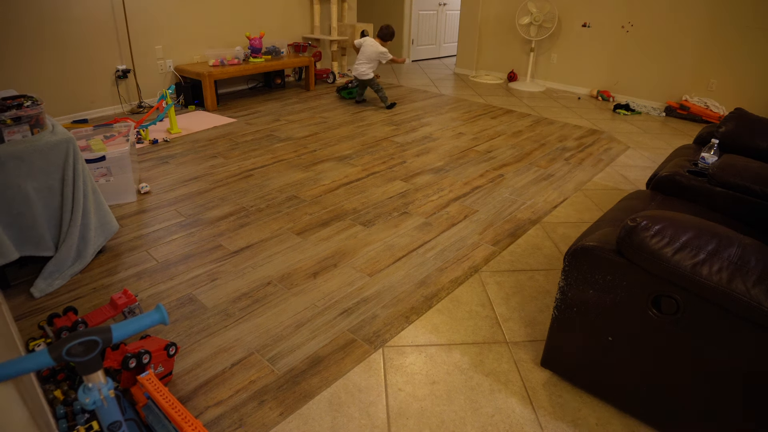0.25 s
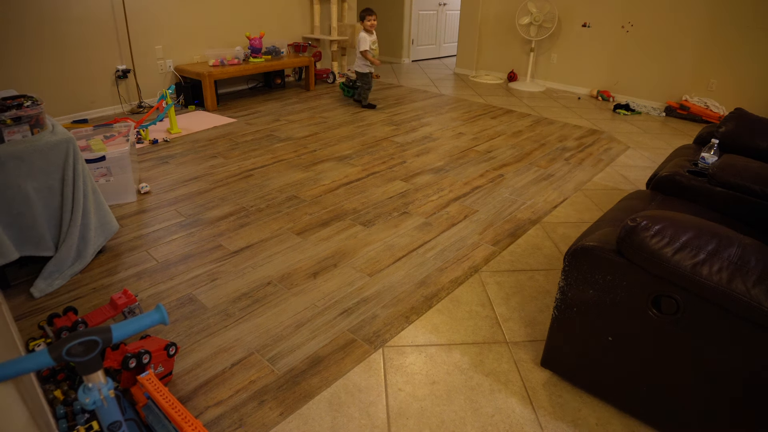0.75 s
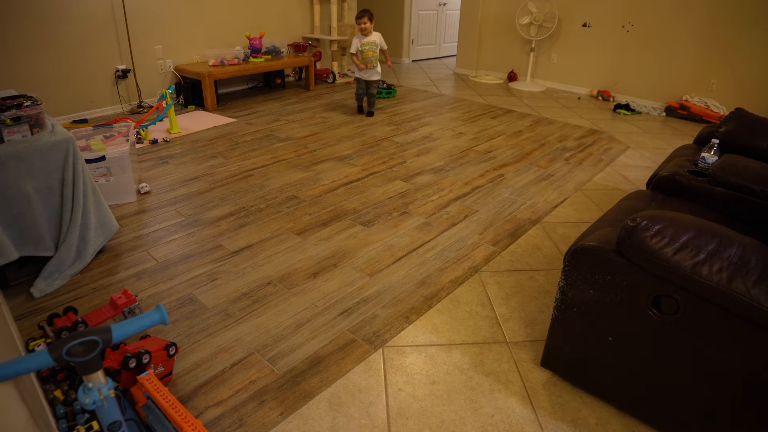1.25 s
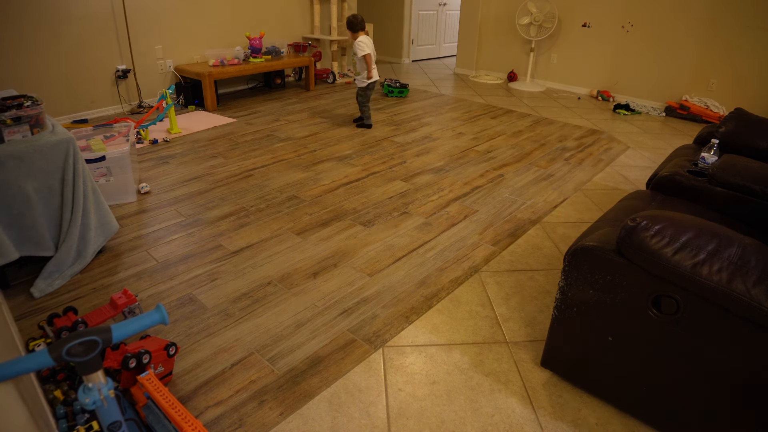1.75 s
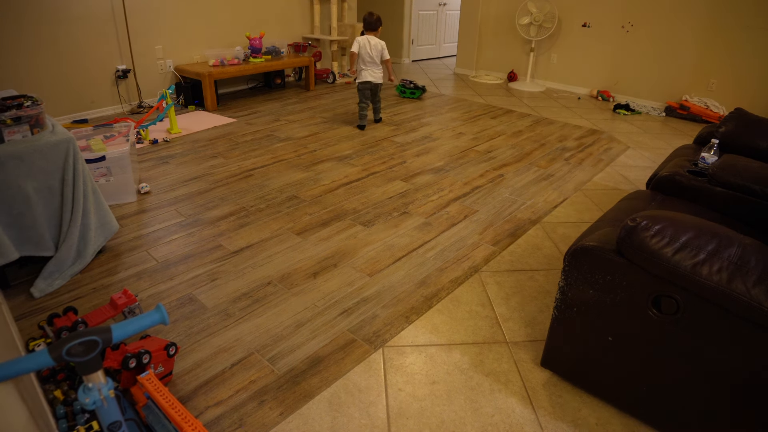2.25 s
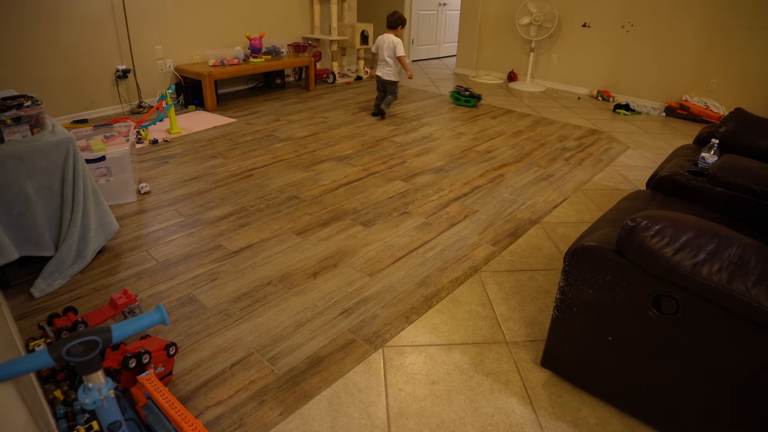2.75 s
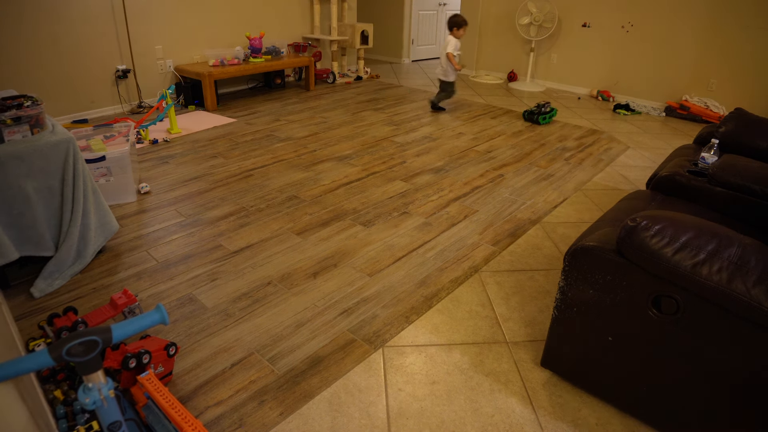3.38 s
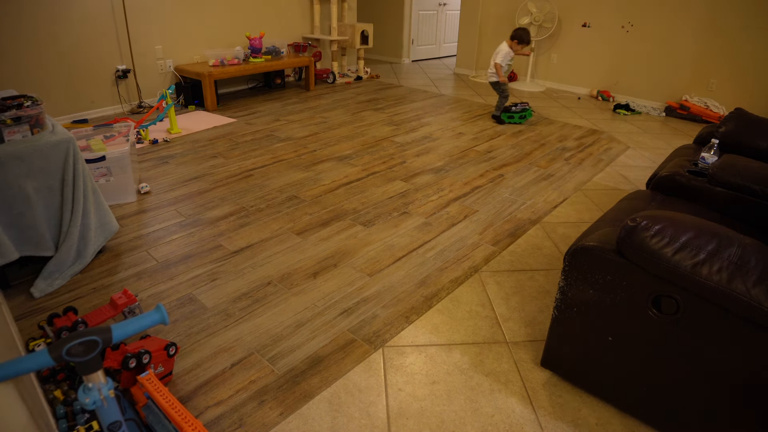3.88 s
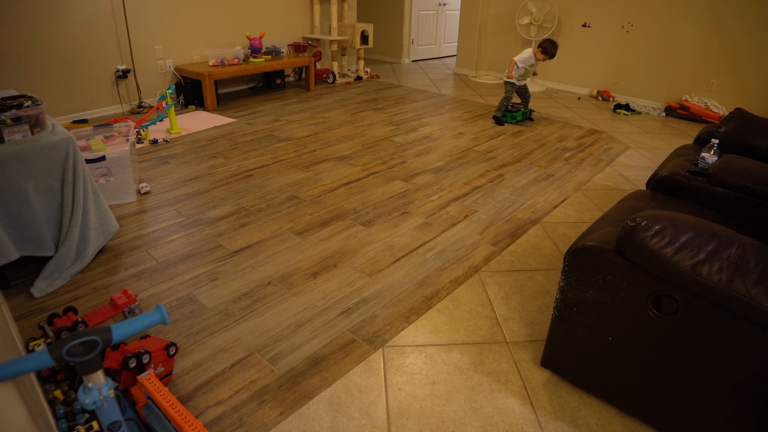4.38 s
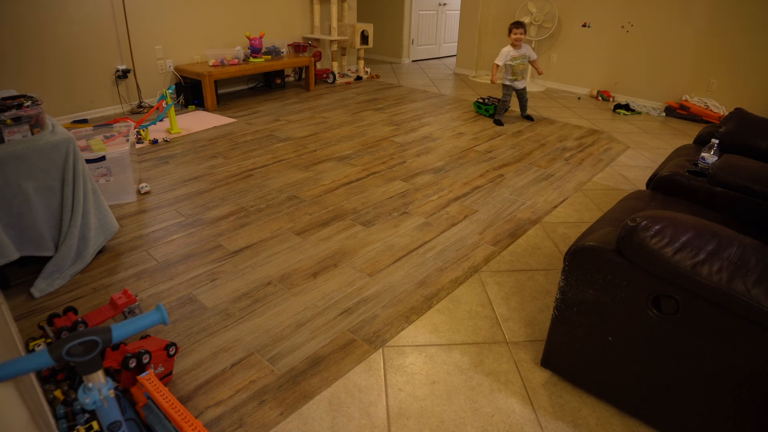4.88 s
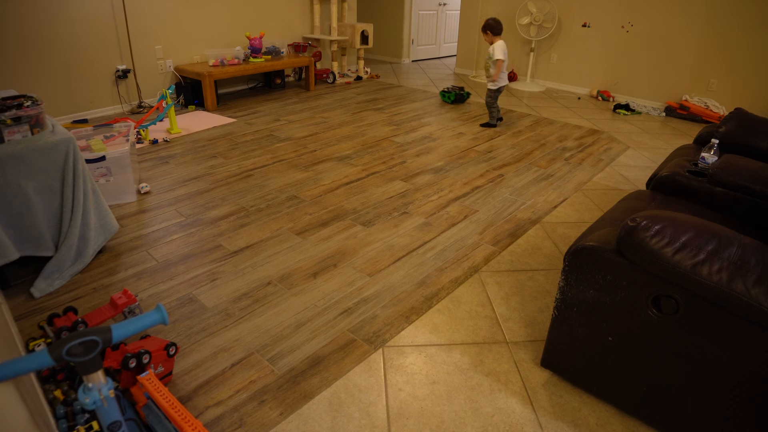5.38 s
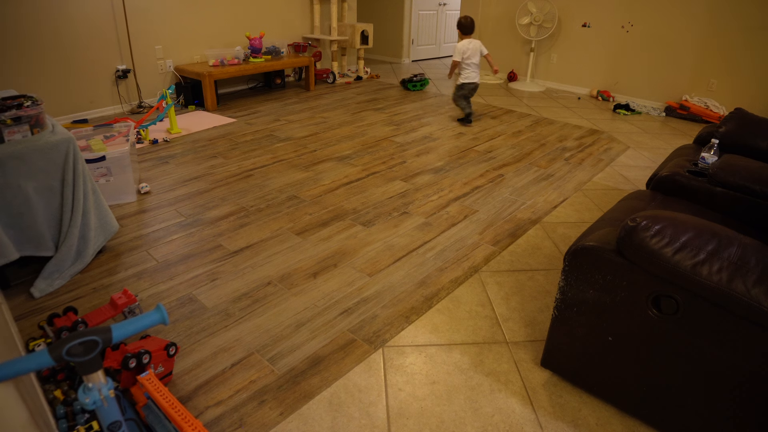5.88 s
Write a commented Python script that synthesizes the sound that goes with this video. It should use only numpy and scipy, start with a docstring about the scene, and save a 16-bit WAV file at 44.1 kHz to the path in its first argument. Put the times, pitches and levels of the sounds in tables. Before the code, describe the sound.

A radio-controlled toy truck is already running on a hard floor, coasts briefly, then darts off six more times. Each spurt brings a high electric whine with rattling, grinding plastic gears and short squeals from a second motor. The tyres rumble and scrub, and the body bumps lightly around the middle. The longest run comes last, ending in a skid. One microphone a few metres away picks up brief living room echo and faint mains hum.

```python
"""Living room, hard floor, mono microphone a few metres from a radio-controlled toy truck.
It is already at speed, coasts, and darts off again at 0.5 s: the motor pinions whine up, loose plastic
gears rattle and grind under load, the tyres rumble and scrub. Five more spurts follow, a coast after
each. It bumps the floor near 3 s and at 4.1 s; the longest run, from 4.7 s, ends in a skid near 6 s.
Throughout, the room rings briefly over a faint mains hum."""
import sys
import numpy as np
from scipy import signal
from scipy.fft import rfft, irfft, next_fast_len
from scipy.io import wavfile
from scipy.ndimage import map_coordinates

SR = 44100
rng = np.random.default_rng(int(sys.argv[2]) if len(sys.argv) > 2 else 0)


def digitize_waveform(pressure):
    """Quantize a signal to 16-bit integers and store it at the path in sys.argv[1].

    Rows of a 2-D input are taken as channels; values are limited to [-1, 1].
    """
    field = np.atleast_2d(pressure).T
    bounded = np.clip(field, -1, 1)
    quanta = np.round(bounded * 32767).astype(np.int16)
    wavfile.write(sys.argv[1], SR, quanta)


N = 270818

# still air of the house: f/Hz, relative level/dB
AIR_SPECTRUM = [(20, -27), (40, -20), (65, -1), (100, 5), (250, 11), (600, -15.5), (2000, 4.5),
                (15000, -37)]
# ring of the living room: f/Hz, t60/s
ROOM_DECAY = [(150, 0.55), (1000, 0.78), (4000, 0.45), (12000, 0.49)]

# spurts of throttle: start/s, held/s, nominal mesh rate/Hz, whine trim/dB, tooth-edge trim/dB,
# load on starting/dB, load on letting go/dB
SPURTS = [(-.1, 0.21, 3480, 0.5, 1, -6, 2), (.48, 0.59, 3370, -2, -1.5, 12.5, 5.5),
          (1.345, .44, 3660, -4.5, -3.5, 5, 8), (2.02, 1.06, 3490, -.5, 1, 6, -2),
          (3.449, .483, 3440, 0, 2, 5, 0), (4.193, .31, 3334, 1.5, 0, 0.5, 3),
          (4.706, 1.24, 3520, .5, 0.5, 5, 1)]
# the wheels snag and the motor sags: t/s, time to deepest sag/s, mesh rate lost at cruise/Hz
SNAGS = [(.49, .022, 650), (.63, .04, 90), (.81, 0.042, 99.2), (1.39, .03, 597.7), (2.41, .04, 199.7),
         (2.66, .04, 170.4), (2.75, .035, 280.4), (2.875, .015, 181), (3.01, .02, 261),
         (5.165, 0.046, 341.3), (5.73, .11, 469.3)]
# how hard the ride shakes the chassis: t/s, relative level/dB
RIDE_SHAKE = [(0, 3.5), (.12, 3), (.5, -1), (.62, 1), (.8, -0.5), (1.05, 1), (1.42, 1), (1.72, -4.5),
              (2.15, -.5), (2.8, 1), (2.97, -2.5), (3.3, 3), (3.52, -0.5), (4.4, 2), (5, -1), (5.42, 1.5),
              (5.74, -4), (5.9, 0.5)]

# tread drumming on the floor: f/Hz, relative level/dB
ROLL_SPECTRUM = [(30, -55), (100, -38), (160, -15.5), (230, -6), (330, -2.5), (500, -0.5), (750, -0.5),
                 (950, 3.5), (1300, -3), (2500, -69)]
# the tyres drum harder over seams in the floor: t/s, boost/dB
FLOOR_SEAMS = [(.045, 3), (.595, 6.5), (.965, 6), (1.5, 4.5), (2.135, 4), (2.37, 2), (5.79, 5.5)]
# sliding tyres: start/s, end/s, level/dB
SKIDS = [(0.035, 0.316, -43), (1.122, 1.301, -47), (1.8, 2.019, -44), (2.015, 2.188, -40),
         (3.168, 3.445, -46), (5.799, 5.988, -37.5)]

# jolts of the chassis: t/s, relative level/dB
JOLTS = [(0.6214, -24), (2.4189, -16.5), (2.7048, -16.5), (2.796, -18), (3.0184, -19), (3.5349, -23),
         (3.665, -16), (3.7274, -17), (4.113, -33), (4.263, -31), (4.4094, -22), (5.0848, -33),
         (5.1766, -15), (5.5473, -32)]
# resonances of the plastic shell: f/Hz, width/Hz, gain/dB
SHELL_MODES = [(1890, 440, -4.5), (3550, 230, 2), (5540, 260, -7.5), (10200, 660, -9.5)]
# bumps on the floor: t/s, relative thud level/dB, relative clatter level/dB
BUMPS = [(2.887, -51, -28.5), (3.02, -47, -31.5), (4.115, -42.5, -30.5)]
# loose parts clattering: f/Hz, relative level/dB
CLATTER_SPECTRUM = [(300, -22), (1500, 5), (3500, 0), (6000, -7), (13000, -26), (16000, -28)]

# thin plastic ribs of the body: f/Hz, width/Hz, relative level/dB
RIB_MODES = [(9900, 590, 2), (10340, 470, 2), (10950, 930, -4), (11900, 1100, 2.5), (12700, 1100, -3),
             (13700, 1300, -4)]
# their buzz in the top treble: t/s, relative level/dB
RIB_BUZZ = [(.11, 2.5), (.33, -9), (.57, 0.5), (.79, -8), (.95, -2), (1.43, 0), (1.53, 2.5), (2.1, -1.5),
            (2.3, 3.5), (3.25, 5), (3.5, 2.5), (3.8, 6), (4.25, -1.5), (4.95, 4), (5.35, 0), (5.55, -7),
            (5.78, -4), (5.9, -5)]
# loose teeth rattling: f/Hz, relative level/dB
RATTLE_SPECTRUM = [(60, -73), (300, -31.5), (800, -8), (970, -5.5), (1150, -9.5), (1350, -1), (1550, -2),
                   (1850, 0.5), (2400, 0.5), (3200, 0), (3700, -1), (4200, -7), (5200, -2), (7000, -14),
                   (9000, -15.5), (15000, -54)]
# teeth grinding under load: f/Hz, relative level/dB
GRIND_SPECTRUM = [(300, -70), (3500, -21), (4400, -1), (5000, -2), (5450, -1), (6100, -1.5), (6700, -19),
                  (9000, -35)]
# sharp tooth edges biting: f/Hz, relative level/dB
EDGE_SPECTRUM = [(4000, -24), (6500, 4), (7500, 6.5), (8500, -2), (9400, -1.5), (10200, -17.5), (11500, -3),
                 (13000, -19), (15500, -21)]

# second motor labouring in starts and turns:
# start/s, length/s, first mesh rate/Hz, mesh rate it glides towards/Hz, relative level/dB
SQUEALS = [(0.579, .16, 2949, 2770, -29), (.84, .07, 2450, 2800, -31), (1.372, .06, 2503, 2250, -33.5),
           (2.057, .12, 2610, 3110, -32), (2.421, .12, 3102, 2330, -29), (2.561, 0.097, 2780, 2805, -33),
           (3.115, .03, 3145, 2553, -37), (3.49, .07, 2520, 3123, -34), (3.905, 0.058, 3099, 2400, -33),
           (4.252, 0.223, 2486, 3042, -32), (4.76, 0.12, 2790, 3053, -34), (5.08, 0.037, 2710, 2548, -32),
           (5.848, 0.066, 2600, 2850, -32), (5.965, 0.043, 2400, 2200, -34.5)]
# mesh partials of that dragged motor: multiple, relative level/dB
SQUEAL_PARTIALS = [(1, -3), (2, 1.5), (3, -13), (4, -14.5), (5, -27)]
# upper mesh partials of the driving motor: multiple, relative level/dB
WHINE_PARTIALS = [(2, -4), (3, -8.5), (4, -22)]
# how well the gearbox radiates those partials: f/Hz, gain/dB
GEARBOX_RADIATION = [(1000, -10), (2400, -6), (3000, -8.5), (3500, -1), (3850, -13), (4300, 5), (5400, 10),
                     (6100, -2), (6700, -3.5), (7450, -3.5), (8600, 5), (10300, 0), (12000, -14),
                     (15000, -6)]

CRUISE_HZ = 3500  # mesh rate that the layer levels refer to
TOP_HZ = 15720  # band limit
SQUEAL_ATTACK_S, SQUEAL_RELEASE_S = 0.011, 0.055
TIME = np.arange(N) / SR


def amp(db):
    """Decibels to gain."""
    return 10 ** (np.asarray(db) / 20)


def unit(x):
    """Scale to rms 1."""
    return x / np.sqrt(np.mean(x ** 2) + 1e-20)


def along(points, hz):
    """Read (f/Hz, value) points on a log axis."""
    f, values = np.transpose(points)
    return np.interp(np.log(hz + 1), np.log(f + 1), values)


def curves(rows):
    """One value per sample for each column after t/s."""
    times, *columns = np.transpose(rows)
    return [np.interp(TIME, times, column) for column in columns]


def wobble(rate):
    """A smooth random curve at rms 1, rate knots a second."""
    knots = rng.standard_normal(int(N * rate / SR) + 4)
    return unit(map_coordinates(knots, [TIME * rate]))


def gate(start, length, attack, release):
    """An easing attack, hold and release, 0-1."""
    age = np.maximum(TIME - start, 0)
    return (1 - np.exp(-age / attack)) * np.clip(1 + (length - age) / release, 0, 1)


def swell(start, rise):
    """Peaks at 1 after rise seconds, then dies away."""
    age = np.maximum(TIME - start, 0) / rise
    return age * np.exp(1 - age)


def filtered(x, response):
    """Shape x by a response of frequency."""
    size = next_fast_len(N + SR // 2)
    return irfft(rfft(x, size) * response(np.fft.rfftfreq(size, 1 / SR)), size)[:N]


def coloured(x, spectrum):
    """Give x a spectrum, at rms 1."""
    return unit(filtered(x, lambda hz: amp(along(spectrum, hz))))


def resonate(x, modes):
    """Pass x through resonances of alternating sign: f/Hz, width/Hz, gain/dB."""
    return filtered(x, lambda f: sum(
        (-1) ** k * amp(db) * 1j * f * width / (hz * hz - f * f + 1j * f * width)
        for k, (hz, width, db) in enumerate(modes)))


def impacts(rate, scatter_db):
    """Randomly timed contacts of scattered size, rate a second."""
    hits = (rng.random(N) < rate / SR) * rng.choice([-1, 1], N)
    return unit(hits * amp(scatter_db * rng.standard_normal(N)) / np.sqrt(rate))


def bursts(events, t60):
    """A short dying scuff of noise at each (t/s, level/dB)."""
    envelope = sum(amp(db - 60 * np.abs(TIME - s) / t60) * (TIME >= s) for s, db in events)
    return envelope * rng.standard_normal(N)


def background(hum_hz=120, hum_db=-71, air_db=-60):
    """Room tone: wavering mains hum and the still air of the house."""
    hum = unit(np.sin(2 * np.pi * hum_hz * TIME)) * amp(1.4 * wobble(5.4))
    return amp(hum_db) * hum + amp(air_db) * coloured(rng.standard_normal(N), AIR_SPECTRUM)


def room(x, wet_db=-1, hop=1024):
    """A few metres off: direct sound plus a diffuse tail that keeps changing as the truck moves."""
    window = np.sin(np.pi * np.arange(2 * hop) / (2 * hop))
    pieces = np.lib.stride_tricks.sliding_window_view(np.pad(x, (hop, 2 * hop)), 2 * hop)[::hop] * window
    # each piece rings with a decaying noise tail of its own
    hz, t, spectra = signal.stft(rng.standard_normal((len(pieces), SR // 3)), SR, nperseg=256)
    tails = signal.istft(spectra * amp(-60 * t / along(ROOM_DECAY, hz)[:, None]), SR, nperseg=256)[1]
    echoes = signal.fftconvolve(pieces, tails / np.linalg.norm(tails, axis=1, keepdims=True), axes=1)
    when = hop * np.arange(len(pieces))[:, None] + np.arange(echoes.shape[1])
    wet = np.bincount(when.ravel(), echoes.ravel())[hop:hop + N]
    return (x + amp(wet_db) * wet) / np.sqrt(1 + amp(2 * wet_db))


def drive(spin_up_s=0.069, coast_s=0.37, creep_hz_per_s=250, friction_hz_per_s=1300):
    """The motor spins up under power and coasts down: mesh rate/Hz, throttle (0-1), tooth load/dB."""
    speed = np.full(N, float(SPURTS[0][2]))  # already at speed
    throttle = load_db = 0
    for start, held, top_hz, _, _, start_db, stop_db in SPURTS:
        powered, coasting = np.clip(TIME - start, 0, held), np.maximum(TIME - start - held, 0)
        lag_hz = (top_hz - np.interp(start, TIME, speed)) * np.exp(-powered / spin_up_s)
        driven_hz = top_hz - lag_hz + creep_hz_per_s * powered
        run_hz = driven_hz * np.exp(-coasting / coast_s) - friction_hz_per_s * coasting
        speed = np.where(TIME >= start, np.maximum(run_hz, 1), speed)
        throttle = np.maximum(throttle, gate(start, held, attack=0.023, release=0.1))
        # the teeth are pressed hard at each end of a spurt
        letting_go = np.exp(-((TIME - start - held) / 0.04) ** 2)
        load_db = load_db + start_db * swell(start, rise=0.056) + stop_db * letting_go
    sag_hz = sum(lost_hz * swell(s, rise) for s, rise, lost_hz in SNAGS)
    return speed * (1 - sag_hz / CRUISE_HZ), throttle, load_db


def level(motion, cruise_db, octave_db, coast_drop_db, by_load, by_ride):
    """A layer's level/dB from speed, load and ride; octave_db is the (powered, coasting) speed slope."""
    speed, throttle, load_db = motion
    ride_db, = curves(RIDE_SHAKE)
    octaves = np.log2(speed / CRUISE_HZ)
    powered_db = throttle * octave_db[0] * octaves
    coasting_db = (1 - throttle) * (octave_db[1] * octaves - coast_drop_db)
    return cruise_db + powered_db + coasting_db + by_load * load_db + by_ride * ride_db


def tyres(motion, scrub_hz=1345, scrub_width_hz=85):
    """Tread blocks drum on the hard floor; sliding rubber rings one wheel resonance."""
    roll_db = level(motion, -42.5, octave_db=(9.5, 6), coast_drop_db=2, by_load=0.039, by_ride=0.96)
    seam_db = sum(db * swell(s, rise=0.012) for s, db in FLOOR_SEAMS)
    roll = amp(roll_db + seam_db) * coloured(impacts(1500, scatter_db=3), ROLL_SPECTRUM)
    slide = sum(amp(db) * np.clip(np.minimum(TIME - start, end - TIME) / 0.05, 0, 1)
                for start, end, db in SKIDS)
    ring = resonate(rng.standard_normal(N), [(scrub_hz, scrub_width_hz, 0)])
    return roll + slide * unit(resonate(ring, [(scrub_hz, 300, 0)]))


def knocks():
    """Jolts clack the shell; bumps thud in the floor and make loose parts clatter."""
    shell = resonate(bursts(JOLTS, t60=0.029), SHELL_MODES)
    clacks = resonate(shell, [(3486, 5300, 0)])
    floor_hits = bursts([(s, db) for s, db, _ in BUMPS], t60=0.18)
    thuds = resonate(floor_hits, [(174.3, 44, 0.5), (500, 240, 1)])
    part_hits = bursts([(s, db) for s, _, db in BUMPS], t60=0.22)
    clatter = filtered(part_hits, lambda hz: amp(along(CLATTER_SPECTRUM, hz)))
    return amp(13.5) * clacks + amp(20.5) * thuds + amp(8) * clatter


def squeaks(per_second=45, centre_hz=10900, life_s=0.0031, fall=0.06, scatter_db=9):
    """Plastic parts slip for an instant: tiny chirps, mostly falling."""
    count = int(per_second * N / SR)
    pitch, life, bend, strength, phase = rng.standard_normal((count, 5)).T[:, :, None]
    when = np.sort(rng.random(count)) * N
    t = np.arange(-SR // 60, SR // 60) / SR
    hz = np.clip(centre_hz * np.exp(0.079 * pitch), 0, TOP_HZ)
    width_s = life_s * np.exp(0.25 * life)
    glide = fall * (1 + 0.62 * bend) / (2 * width_s)  # share of the pitch lost a second
    envelope = amp(scatter_db * strength) * np.exp(-(t / width_s) ** 2)
    chirps = envelope * np.sin(2 * np.pi * hz * (t - glide * t * t / 2) + phase)
    index = when.astype(int)[:, None] + np.arange(len(t))
    return unit(np.bincount(index.ravel(), chirps.ravel(), N)[:N])


def ribs(contact_rate, chatter_db=6):
    """Tooth contacts shake each rib into short chirps of its own."""
    buzz = 0
    for hz, width_hz, db in RIB_MODES:
        strikes = impacts(contact_rate, scatter_db=3) * amp(chatter_db * wobble(55))
        buzz = buzz + amp(db) * unit(filtered(strikes, lambda f: (1 + 1j * (f - hz) / width_hz) ** -2))
    return unit(buzz)


def pinion(speed, partials, flutter, jitter, rough_db):
    """Mesh tone of (multiple, level/dB) partials: play in the gears shakes its rate and strength."""
    rate = speed * (1 + flutter * wobble(150) + jitter * wobble(1100))
    phase = 2 * np.pi * np.cumsum(rate) / SR
    return sum(amp(db) * unit(amp(rough_db * wobble(600)) * np.sin(k * phase)) for k, db in partials)


def steering_squeal(glide_s=0.055, fade_db_per_s=43):
    """The second motor labours, loudest an octave above its mesh rate; each squeal glides and fades."""
    speed, gain = np.full(N, float(CRUISE_HZ)), 0
    for start, length, first_hz, final_hz, db in SQUEALS:
        age = np.maximum(TIME - start, 0)
        speed = np.where(TIME >= start, final_hz + (first_hz - final_hz) * np.exp(-age / glide_s), speed)
        labouring = gate(start, length, SQUEAL_ATTACK_S, SQUEAL_RELEASE_S)
        gain = gain + amp(db - fade_db_per_s * age) * labouring
    return gain * pinion(speed, SQUEAL_PARTIALS, flutter=0.028, jitter=0.024, rough_db=3)


def motor_whine(motion, trim_db, edge_db, resonance_hz=3420, half_width_hz=296, coast_drop_db=24):
    """The driving motor; each partial swells where it meets a resonance of the gearbox."""
    speed, throttle, load_db = motion
    detuned_db = 10 * np.log10(1 + ((speed - resonance_hz) / half_width_hz) ** 2)
    steering = sum(gate(start, length, SQUEAL_ATTACK_S, SQUEAL_RELEASE_S)
                   for start, length, *_ in SQUEALS)
    choked_db = 0.11 * load_db + 2.5 * steering  # load chokes the tone; the second motor takes power
    tone_db = -28.5 + trim_db - detuned_db - coast_drop_db * (1 - throttle) - choked_db
    tone = pinion(speed, [(0.98, tone_db)], flutter=0.027, jitter=0.036, rough_db=3)
    # the upper partials bite with the sharp tooth edges
    upper = [(k, edge_db + 3 + db + along(GEARBOX_RADIATION, k * speed)) for k, db in WHINE_PARTIALS]
    return tone + pinion(speed, upper, flutter=0.0177, jitter=0.022, rough_db=3.5)


def gearbox(motion):
    """Both motors plus backlash: loose teeth strike more often as the gears run faster."""
    whine_trim_db, edge_trim_db = curves([(s, whine, edge) for start, held, _, whine, edge, *_ in SPURTS
                                          for s in (start, start + held)])
    rib_trim_db, = curves(RIB_BUZZ)
    rattle_db = level(motion, -31, octave_db=(2, 9), coast_drop_db=0, by_load=0.19, by_ride=0.93)
    grind_db = level(motion, -37, octave_db=(5.5, 12.5), coast_drop_db=2, by_load=0.73, by_ride=1)
    rib_db = level(motion, -45.5, octave_db=(-1, 4), coast_drop_db=14.5, by_load=0.1, by_ride=0.34)
    edge_db = level(motion, -40, octave_db=(8.5, 11), coast_drop_db=13.5, by_load=0.071, by_ride=0.1)
    edge_db += edge_trim_db
    contact_rate = 2 * motion[0]  # each tooth strikes on the way in and on the rebound
    rattle = amp(rattle_db) * coloured(impacts(contact_rate, scatter_db=2.5), RATTLE_SPECTRUM)
    grind_db += 1.83 * wobble(110)
    grind = amp(grind_db) * coloured(impacts(contact_rate, scatter_db=0), GRIND_SPECTRUM)
    edges = amp(edge_db) * coloured(impacts(contact_rate, scatter_db=2.5), EDGE_SPECTRUM)
    buzz = amp(rib_db + rib_trim_db) * (ribs(contact_rate) + amp(-7.5) * squeaks())
    shake = amp(wobble(70) + 0.42 * wobble(420))  # the bouncing wheels load the teeth unevenly
    motors = motor_whine(motion, whine_trim_db, edge_db) + steering_squeal()
    return shake * (motors + rattle + grind + edges + buzz)


def scene():
    """The truck in the living room at one microphone, the same in both channels."""
    motion = drive()
    truck = gearbox(motion) + tyres(motion) + knocks()
    mono = room(truck) + background()
    return np.array([mono, mono])


def record(dry):
    """The recorder keeps nothing above its band limit."""
    return np.array([filtered(channel, lambda hz: hz < TOP_HZ) for channel in dry])


dry = scene()
out = record(dry)
digitize_waveform(out)
```